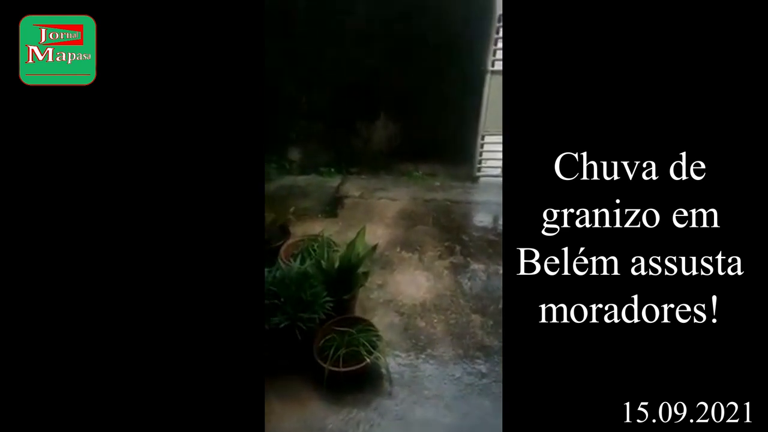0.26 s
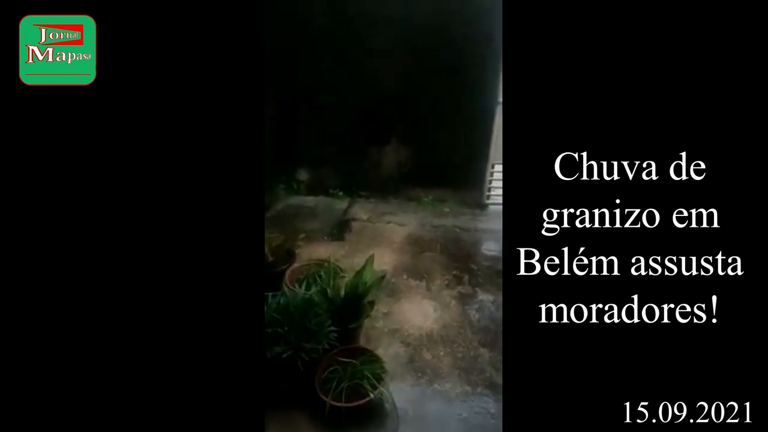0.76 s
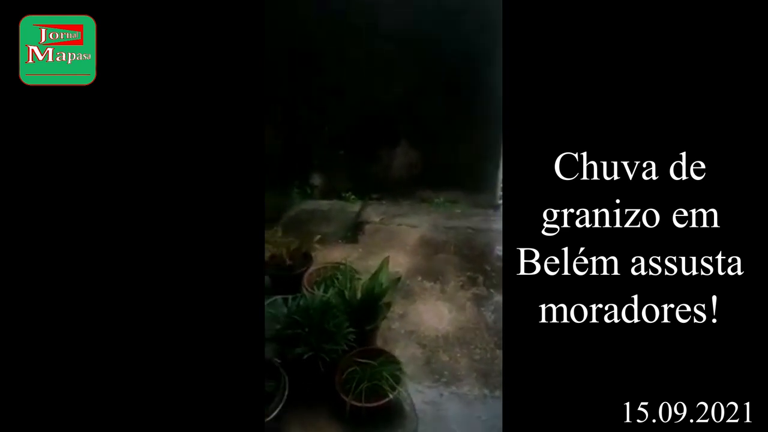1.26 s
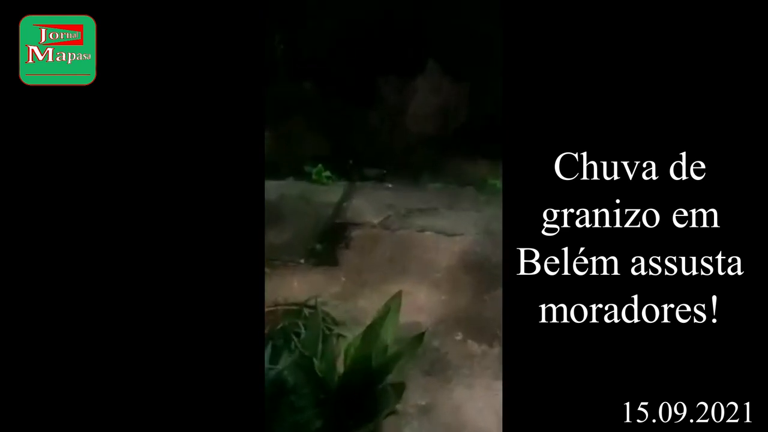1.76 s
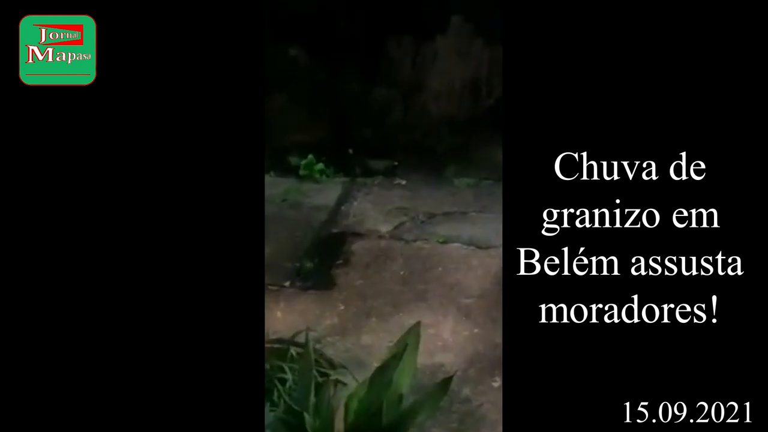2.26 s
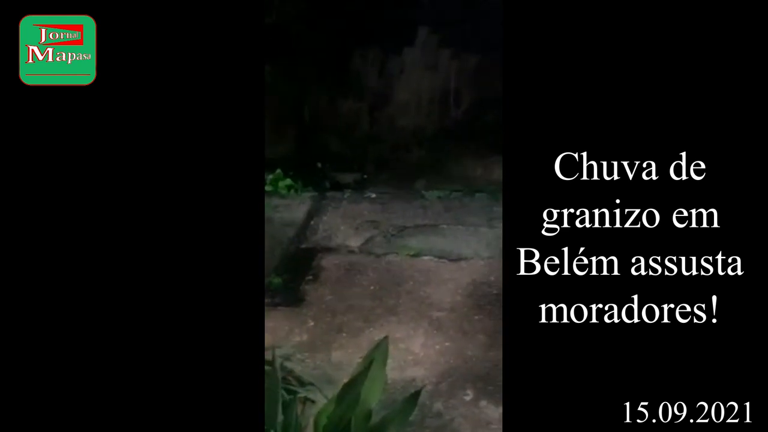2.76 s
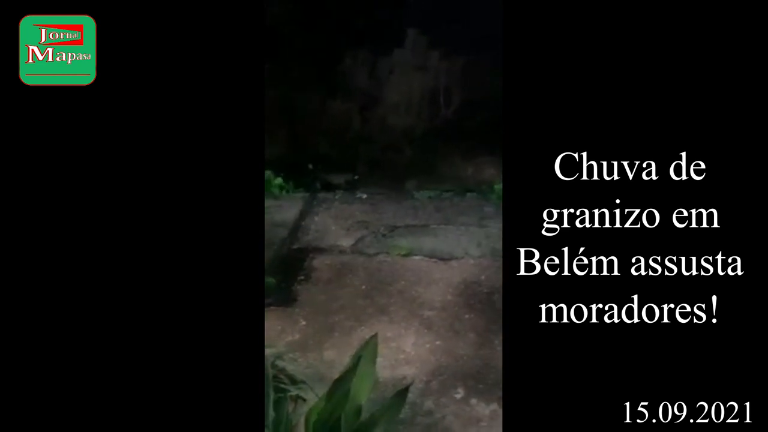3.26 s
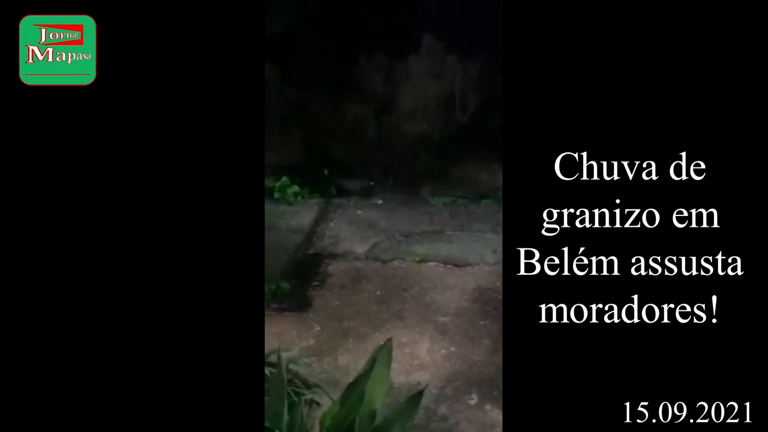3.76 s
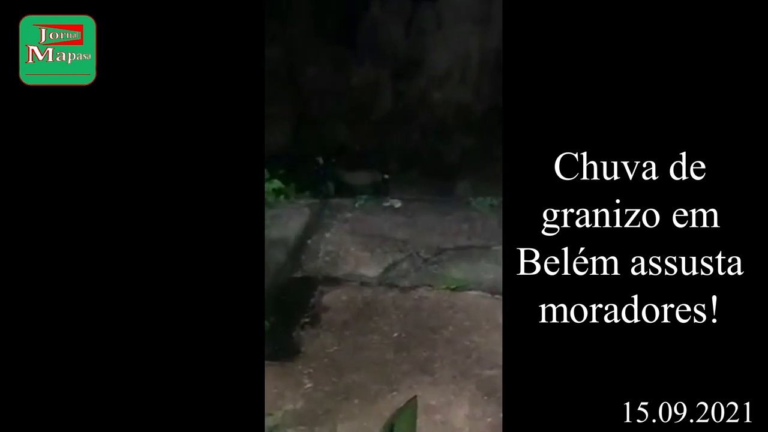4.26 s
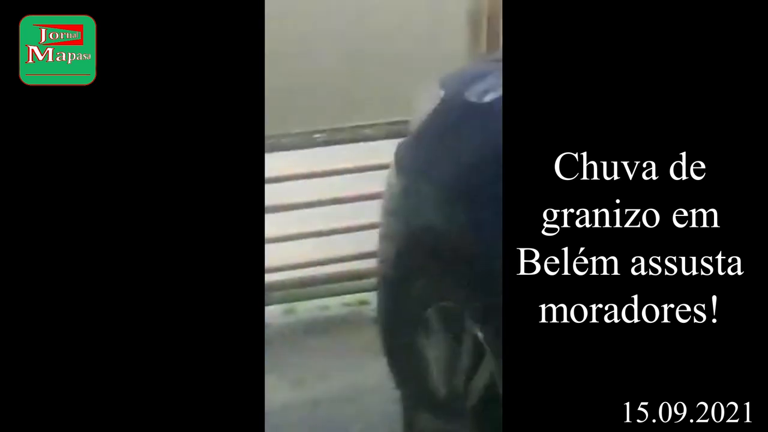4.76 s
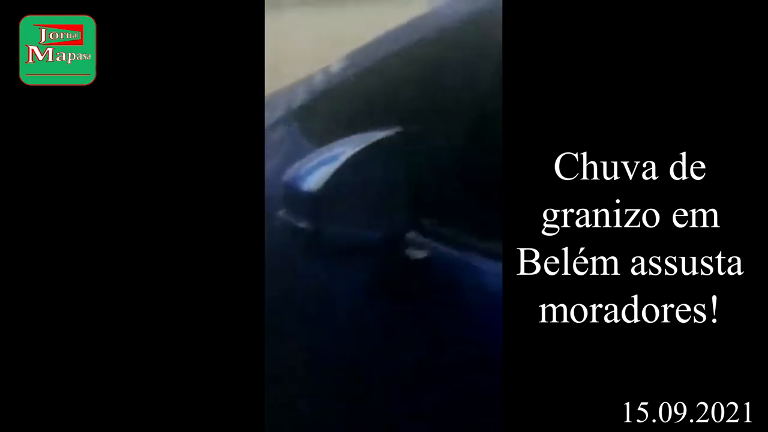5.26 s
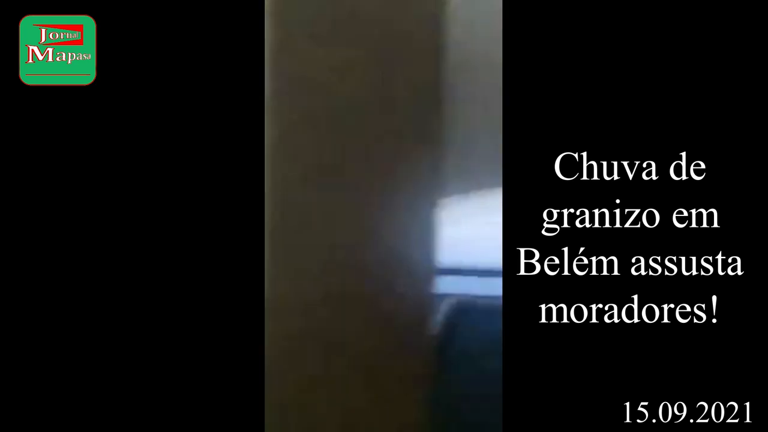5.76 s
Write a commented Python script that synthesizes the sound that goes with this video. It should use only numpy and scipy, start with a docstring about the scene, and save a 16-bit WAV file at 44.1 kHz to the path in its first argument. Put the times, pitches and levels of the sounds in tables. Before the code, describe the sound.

A dense downpour with hail, heard from under a carport roof facing a paved yard. Steady drumming, splashing and hiss fill everything, with constant tiny ticks and irregular sharp cracks of larger stones. Around three and a half seconds a cluster knocks a hollow, ringing sheet. Near five seconds a lumpy low roll swells like distant thunder. The wide stereo pickup is compressed, with flickering, watery treble and dulled top.

```python
"""Hail and downpour at a carport

A downpour with hail falls on a paved yard, heard from under the roof of a carport. Shaped noise drums, splashes
and hisses; bursts of noise make hailstones crack on the paving, clack, or knock on a hollow sheet that rings.
Near the end a low roll of noise, like far thunder, swells through the carport's resonances.
The treble flickers: weak patches drop out, which sounds watery. A thin whine wavers on top."""
import sys
import numpy as np
from scipy import signal
from scipy.fft import rfft, irfft, next_fast_len
from scipy.io import wavfile
from scipy.ndimage import uniform_filter1d, minimum_filter1d

SR = 44100
rng = np.random.default_rng(int(sys.argv[2]) if len(sys.argv) > 2 else 0)


def unload_wav(signal):
    """Save mono or channel-first audio to the path in sys.argv[1] as 16-bit WAV at rate SR, clipped to [-1, 1]."""
    wavfile.write(
        sys.argv[1],
        SR,
        np.round(np.clip(np.atleast_2d(signal).T, -1, 1) * 32767).astype(np.int16),
    )


N = 265641

TIME = np.arange(N) / SR
PADDED = next_fast_len(N, real=True)
FREQ = np.maximum(np.fft.rfftfreq(PADDED, 1 / SR), 1)
STFT_SIZE, STFT_OVERLAP = 2048, 1536  # samples


def from_db(db):
    """Decibels to gain."""
    return 10 ** (np.asarray(db) / 20)


def rms_one(x):
    """Scale to unit power."""
    return x / np.sqrt(np.mean(x ** 2) + 1e-20)


def in_time(rows):
    """Automation curves: one per column after the time, joined by straight lines."""
    seconds, *columns = np.transpose(rows)
    return [np.interp(TIME, seconds, column) for column in columns]


def colour(x, spectrum, modes=()):
    """Give a sound a broad spectrum with resonances standing on it."""
    hz, db = np.transpose(spectrum)
    broad = from_db(np.interp(np.log(FREQ), np.log(hz), db))
    peaks = sum(from_db(level) / (1 + 2j * (FREQ - centre) / width) for centre, width, level in modes)
    return irfft(rfft(x, PADDED) * broad * (1 + peaks), PADDED)[..., :N]


def drift(rate):
    """Slow chance of unit spread, changing about rate times a second."""
    smooth = rfft(rng.standard_normal(PADDED)) / (1 + (FREQ / rate) ** 2)
    return rms_one(irfft(smooth, PADDED)[:N])


def diffuse(alike_hz):
    """Stereo noise from all around: long waves reach left and right much alike, short ones do not."""
    alike = 0.85 / (1 + (FREQ / alike_hz) ** 4)
    alike = alike * FREQ / (FREQ + 8)  # the very lowest waves differ again
    mid, side = rfft(rng.standard_normal((2, PADDED)))
    stereo = np.sqrt(1 + alike) * mid + np.sqrt(1 - alike) * side * [[1], [-1]]
    return rms_one(irfft(stereo, PADDED)[:, :N])


def impacts(per_s, spread_db):
    """Clicks at random moments, many small and few large."""
    sizes = from_db(spread_db * np.minimum(rng.exponential(1, N), 4))
    return sizes * (rng.random(N) < per_s / SR)


def drops(per_s, spread_db, near_db):
    """Single near drops over the smooth merged sound of the far ones."""
    clicks = np.array([impacts(per_s, spread_db) for _ in range(2)])
    near = clicks * rng.choice([-1, 1], (2, N))
    far = rng.standard_normal((2, N))
    return rms_one(from_db(near_db) * rms_one(near) + far)


def patter(x, patchy_db, size=5):
    """The noise flickers at random in small patches of time and pitch, size bins wide."""
    cells = signal.stft(x, nperseg=STFT_SIZE, noverlap=STFT_OVERLAP)[2]
    patches = rng.standard_normal(cells.shape[-2:])
    patches = uniform_filter1d(patches, size=size, axis=0)
    patches = uniform_filter1d(patches, size=5, axis=1)
    patchy = signal.istft(cells * from_db(patchy_db * rms_one(patches)), noverlap=STFT_OVERLAP)[1]
    return rms_one(patchy[..., :N])


def dying(start, t60, rise):
    """Envelope of a blow and its crowd of reflections from walls and roof."""
    age = np.maximum(TIME - start, 0)
    return (1 - np.exp(-age / rise)) * from_db(-60 * np.minimum(age / t60, 3))


# Strength of the downpour, which drives drumming, hiss and small hail.
# Each row: time in seconds, level in dB.
RAIN_STRENGTH = [(0.0, -24), (0.74, -21), (0.94, -19), (1.19, -21), (1.34, -22), (1.63, -23), (2.16, -19),
                 (2.65, -21), (2.9, -18.5), (3.17, -20.5), (3.54, -19), (3.69, -21), (4.43, -24.5),
                 (5.0, -21), (5.16, -22.5), (5.9, -24), (6.02, -21)]
USUAL_RAIN_DB = -22


def strength():
    """How much harder than usual the rain falls, in dB."""
    return in_time(RAIN_STRENGTH)[0] - USUAL_RAIN_DB


# Ebb and flow of the splashing; only its swing about the mean is used.
# Each row: time in seconds, level in dB.
SPLASHING_LEVEL = [(0.0, -30), (0.39, -28.5), (0.7, -29), (0.99, -26), (1.36, -29.5), (1.63, -27.5),
                   (2.18, -25), (2.58, -26.5), (2.93, -25.5), (3.55, -29), (3.64, -29), (4.32, -31),
                   (4.63, -29.5), (4.95, -27), (5.33, -28.5), (6.02, -29)]
# Broad spectra of the drumming, the splashes and the spray. Each row: frequency in Hz, gain in dB.
DRUMMING_SPECTRUM = [(200, 3), (420, 9.5), (600, 18), (1300, 17), (2200, 14.5), (4000, -7.5), (9000, -11)]
SPLASH_SPECTRUM = [(600, -9.5), (1200, -5), (1900, 10), (2700, 11), (3500, 9), (4500, 7.5), (7000, 2.5),
                   (15000, -19)]
HISS_SPECTRUM = [(1500, -8.5), (3000, -1), (4500, 4.5), (6500, 9.5), (10000, 7), (15000, 9)]
# Resonances of the drummed roofs.
# Each row: frequency in Hz, width in Hz, level in dB against the broad spectrum.
ROOF_MODES = [(630, 61, -23), (1052, 17, -8)]
# each layer's level before colouring, and its dB of swing per dB of its level curve
DRUM_DB, DRUM_FOLLOWS = -30, 0.64
HISS_DB, HISS_FOLLOWS = -23, 0.92
SPLASH_DB, SPLASH_FOLLOWS_LEFT, SPLASH_FOLLOWS_RIGHT = -25, 0.9, 1.56
# the rain turns thinner: the drumming drops back
THINNING_START_S, THINNING_TAKES_S, THINNING_DB = 2.8, 0.49, -1.18


def rain():
    """Drumming on roofs, splashes in the wet yard and the hiss of fine spray, each a coloured noise."""
    harder_db = strength()
    thinned = np.clip((TIME - THINNING_START_S) / THINNING_TAKES_S, 0, 1)
    drum_db = DRUM_DB + DRUM_FOLLOWS * harder_db + THINNING_DB * thinned
    hiss_db = HISS_DB + HISS_FOLLOWS * harder_db
    splashing_db, = in_time(SPLASHING_LEVEL)
    follows = np.array([[SPLASH_FOLLOWS_LEFT], [SPLASH_FOLLOWS_RIGHT]])
    splash_db = SPLASH_DB + follows * (splashing_db - splashing_db.mean())

    flurry = drift(25)  # drops arrive in clumps
    thuds = patter(diffuse(alike_hz=580), patchy_db=2.0)
    splashes = patter(drops(per_s=1200, spread_db=5.0, near_db=-8.0), patchy_db=5.0, size=2)
    spray = patter(drops(per_s=2000, spread_db=3.5, near_db=-7.5), patchy_db=4.0, size=2)

    drumming = from_db(drum_db + 0.057 * flurry) * colour(thuds, DRUMMING_SPECTRUM, ROOF_MODES)
    splashing = from_db(splash_db + 0.34 * flurry) * colour(splashes, SPLASH_SPECTRUM)
    hiss = from_db(hiss_db + 0.11 * flurry) * colour(spray, HISS_SPECTRUM)
    return drumming + splashing + hiss


# Broad spectrum of ice on paving, shared by small and big stones. Each row: frequency in Hz, gain in dB.
CRACK_SPECTRUM = [(500, -20), (1500, -7), (3500, -7.5), (5500, -7.5), (7000, -5.5), (8000, 0.5),
                  (10000, -3), (15000, -8)]


def small_hail(per_s, t60, level_db):
    """Small stones tick all the time, each blurred by reflections, more loudly when the rain is harder."""
    stones = impacts(per_s, spread_db=3.0)
    decay = from_db(-120 / (t60 * SR))  # power kept from one sample to the next
    power = signal.lfilter([1], [1, -decay], stones ** 2 + 1e-18)
    ticks = rms_one(np.sqrt(power) * rng.standard_normal((2, N)))
    return from_db(level_db + strength()) * colour(ticks, CRACK_SPECTRUM)


# Resonances of the carport, shared by the steady rumble and the swells.
# Each row: frequency in Hz, width in Hz, level in dB against the broad spectrum.
CARPORT_MODES = [(36.3, 3.6, -10), (53.7, 8.8, -7.5), (78.8, 8.7, 6.5), (116.4, 3.8, -1), (223, 18, -43),
                 (282.7, 19.4, -1), (342, 3.5, 0.5)]
# Broad spectrum of the steady rumble. Each row: frequency in Hz, gain in dB.
RUMBLE_SPECTRUM = [(10, -4.5), (25, -5.5), (40, -11.5), (65, -22.5), (130, -14), (200, -12.5), (300, -17),
                   (450, -16.5), (800, -27.5), (3000, -86)]


def steady_rumble():
    """The storm's steady rumble: unsteady diffuse noise booming in the carport's modes."""
    level_db = -0.5 + 0.91 * drift(13.0)
    return colour(diffuse(alike_hz=560) * from_db(level_db), RUMBLE_SPECTRUM, CARPORT_MODES)


SWELL_ATTACK_S, SWELL_RELEASE_DB_PER_S = 0.033, 48


def swell(start, db, hold):
    """Power of one swell of rumble: it rises, holds and dies away."""
    age = TIME - start
    released = np.maximum(age - SWELL_ATTACK_S - hold, 0)
    rise = np.clip(age / SWELL_ATTACK_S, 0, 1)
    return rise * from_db(db - SWELL_RELEASE_DB_PER_S * released) ** 2


# Swells of low rumble, faint ones first and then the roll.
# Each row: start in seconds, deep part level in dB, upper part level in dB, hold in seconds.
SWELLS = [(0.29, -42, -49, 0.32), (1.447, -34.5, -52, 0.15), (2.113, -37, -48, 0.2),
          (2.796, -35, -47, 0.085), (4.885, -26.5, -39, .13), (5.036, -26, -22, 0.072),
          (5.189, -23.5, -21.5, .02), (5.33, -32, -22.5, .03), (5.395, -25, -22.5, 0.038),
          (5.487, -24, -20, 0.035), (5.596, -23.5, -18, 0.029), (5.768, -27.5, -32, .015),
          (5.916, -32, -27.5, .05)]
# Broad spectra of the two parts. Each row: frequency in Hz, gain in dB.
DEEP_SPECTRUM = [(10, -4), (30, 32), (60, 15.5), (110, 22.5), (170, 21.5), (240, 7.5), (600, 4),
                 (3000, -50)]
UPPER_SPECTRUM = [(80, 8), (160, 17.5), (220, 20.5), (350, 18), (450, 16), (650, 9.5), (1000, 6.5),
                  (3000, -12)]


def rolling_swells():
    """A deep and an upper band of diffuse noise swell separately and boom in the carport's modes."""
    deep_power = sum(swell(start, db, hold) for start, db, _, hold in SWELLS)
    upper_power = sum(swell(start, db, hold) for start, _, db, hold in SWELLS)
    deep = np.sqrt(deep_power) * colour(diffuse(alike_hz=700), DEEP_SPECTRUM, CARPORT_MODES)
    upper = np.sqrt(upper_power) * colour(diffuse(alike_hz=650), UPPER_SPECTRUM, CARPORT_MODES)
    return deep + upper


SNAP_DB, SNAP_T60_S = 2.5, 0.014
# a stone's own pitch stands out of its broad crack
CRACK_Q, CRACK_PITCHED_DB, CRACK_BROAD_DB = 2.8, -3.5, -5.5


def crack(ice, start, db, pan_db, t60, hz):
    """One stone on the paving: a dry snap, then splinters and reflections, around the stone's own pitch."""
    rises = np.array([[0.0007], [0.004]])  # seconds; blows start sharply on the left, more softly on the right
    snap = from_db(SNAP_DB) * dying(start, SNAP_T60_S, rises / 3)
    gains = from_db(db + pan_db * np.array([[0.5], [-0.5]]))
    blow = gains * (snap + dying(start, t60, rises)) * ice
    pitched = signal.lfilter(*signal.iirpeak(hz, CRACK_Q, fs=SR), blow + 1e-18)
    return from_db(CRACK_BROAD_DB) * blow + from_db(CRACK_PITCHED_DB) * pitched


# Big hailstones on the paving.
# Each row: start in seconds, level in dB, left over right in dB, decay time T60 in seconds, pitch in Hz.
CRACKS = [(0.478, -6, 8, 0.033, 7000), (0.825, -3.5, -3, 0.17, 5800), (0.981, -14, -3, 0.06, 6000),
          (1.251, -7.5, 3, 0.27, 6500), (1.300, -5, 0, 0.3, 6200), (1.319, -6.5, -5, 0.2, 7000),
          (1.705, -12, 5, 0.06, 6800), (1.782, -5.5, 1, 0.12, 5500), (1.985, -8, 0, 0.08, 7000),
          (2.081, -3, 3, 0.12, 5400), (2.274, -7, 3, 0.06, 6000), (2.306, -1.5, -5, 0.22, 5070),
          (2.433, -12, -9, 0.05, 5500), (2.484, 1.5, -2, 0.21, 4600), (2.729, -6, 4, 0.18, 3600),
          (2.785, -11, 2, 0.08, 6500), (2.810, -11, -3, 0.24, 5300), (3.075, -6.5, -9, 0.14, 7200),
          (3.525, -2.5, -1, 0.23, 4600), (3.574, -3, -2, 0.15, 6200), (3.619, -4, 0, 0.34, 6640),
          (3.642, -6, -9, 0.18, 5400), (3.945, -7.5, -5, 0.34, 6360), (4.604, -8, 3, 0.05, 6600),
          (4.75, 0, -2, 0.22, 6150), (5.196, -9, 1, 0.08, 7200), (5.357, 1.5, 7, 0.042, 6000),
          (5.514, -10, 10, 0.062, 6500), (5.595, -11.5, 9, 0.11, 6500), (5.870, -10, 6, 0.049, 6500)]


def paving_cracks():
    """Big stones crack on the paving: bursts of one gritty noise, each tuned to its own pitch."""
    shards = from_db(1.0 * drift(120))  # bounces and splinters roughen each crack
    ice = shards * patter(drops(per_s=3500, spread_db=4.0, near_db=-5), patchy_db=2.0)
    return colour(sum(crack(ice, *row) for row in CRACKS), CRACK_SPECTRUM)


# Hailstones with a dull clack. Each row: start in seconds, level in dB.
CLACKS = [(1.795, -12.5), (2.310, -13), (2.485, -18), (3.530, -10), (3.585, -12.5), (4.750, -12.5),
          (5.055, -11), (5.357, -7.5)]
# Broad spectrum of a clack. Each row: frequency in Hz, gain in dB.
CLACK_SPECTRUM = [(600, -32), (1400, -2), (2000, 6.5), (3000, -1.5), (5000, -1.5), (12000, -13)]


def dull_clacks():
    """Some stones clack dully: bursts of patchy mid-range noise, different on left and right."""
    blows = sum(from_db(db) * dying(start, t60=0.3, rise=0.0051) for start, db in CLACKS)
    return colour(blows * patter(rng.standard_normal((2, N)), patchy_db=5.5), CLACK_SPECTRUM)


# Hailstones on a hollow sheet, each spot with its own note.
# Each row: start in seconds, level in dB, rattle decay time T60 in seconds, note in Hz.
KNOCKS = [(2.485, -13, 0.12, 1240), (3.524, -10, 0.15, 1237), (3.612, -1.5, 0.14, 884),
          (3.620, -4, 0.077, 1183), (3.630, -12, 0.1, 626), (3.632, -2, 0.17, 983),
          (3.663, -8.5, 0.37, 1236), (3.947, -7.5, 0.87, 743), (4.469, -12, 0.21, 610)]
# Broad spectrum of the rattle. Each row: frequency in Hz, gain in dB.
KNOCK_SPECTRUM = [(150, -18), (400, -6), (560, -1), (800, 0), (1050, -0.5), (1450, -3.5), (2300, -12.5),
                  (6000, -45)]
# Resonances of the sheet.
# Each row: frequency in Hz, width in Hz, level in dB against the broad spectrum.
SHEET_MODES = [(570, 58, -5), (1010, 25, 1), (1196, 24, 3), (1880, 17, 9.5)]
RING_DB, RING_T60_S, RATTLE_DB = -9, 0.12, -2  # the sheet's note, and its rattle under a knock


def hollow_knocks():
    """A stone sets a hollow sheet going: noise rattles in its modes and the struck spot rings as a sine."""
    blows = sum(from_db(db + RATTLE_DB) * dying(start, t60, rise=0.0014) for start, db, t60, _ in KNOCKS)
    rattle = colour(blows * diffuse(alike_hz=600), KNOCK_SPECTRUM, SHEET_MODES)
    notes = 0
    for start, db, _, hz in KNOCKS:
        ring = dying(start, RING_T60_S, rise=0.0015) * np.sin(2 * np.pi * hz * (TIME - start))
        notes = notes + from_db(db + RING_DB) * ring
    return rattle + notes


# Broad spectrum of the fizz. Each row: frequency in Hz, gain in dB.
FIZZ_SPECTRUM = [(7000, -34), (10500, -8), (12500, 8), (15000, 6)]
FIZZ_START_S, FIZZ_DB, FIZZ_T60_S = 3.940, -6, 0.35


def fizz():
    """Once the top fizzes: a brief burst of high noise that dies away."""
    burst = from_db(FIZZ_DB) * dying(FIZZ_START_S, FIZZ_T60_S, rise=0.015)
    return colour(burst * rng.standard_normal((2, N)), FIZZ_SPECTRUM)


def scene():
    """Rain, small and big hail and rumble together."""
    falling = rain() + small_hail(per_s=80, t60=0.036, level_db=-37.0)
    low = steady_rumble() + rolling_swells()
    big_hail = paving_cracks() + dull_clacks() + hollow_knocks() + fizz()
    return falling + low + big_hail


DROPOUT_DEPTH_DB, DROPOUT_KNEE_DB = 24, 0.5


def drop_weak_patches(x, thresholds, size):
    """The treble flickers: patches weak against their surroundings drop out, which sounds watery."""
    hz, _, cells = signal.stft(x, SR, nperseg=STFT_SIZE, noverlap=STFT_OVERLAP)
    power = np.abs(cells) ** 2
    patch = uniform_filter1d(uniform_filter1d(power, size=size[0], axis=0), size=size[1], axis=1)
    around = uniform_filter1d(uniform_filter1d(power, size=45, axis=0), size=25, axis=1)
    above_db = 10 * np.log10((np.abs(patch) + 1e-20) / (np.abs(around) + 1e-20))
    threshold_hz, threshold_db = np.transpose(thresholds)
    needed_db = np.interp(np.log(hz + 1), np.log(threshold_hz), threshold_db)[:, None]
    passed = 0.5 - 0.5 * np.tanh((needed_db - above_db) / DROPOUT_KNEE_DB)
    # neighbours drop out too
    dropped = 1 - minimum_filter1d(minimum_filter1d(passed, size=3, axis=0), size=3, axis=1)
    return signal.istft(cells * from_db(-DROPOUT_DEPTH_DB * dropped), noverlap=STFT_OVERLAP)[1][:N]


WHINE_HZ, WHINE_LEFT_DB, WHINE_RIGHT_DB = 9937.5, -60, -45


def whine():
    """A thin high whine: a sine whose level wavers at random."""
    wavering = np.sin(2 * np.pi * WHINE_HZ * TIME) * (1 + 0.57 * drift(20))
    return from_db([[WHINE_LEFT_DB], [WHINE_RIGHT_DB]]) * wavering


def limit(x, ceiling):
    """Turn the gain down for a few milliseconds around any peak over the ceiling."""
    needed = ceiling / np.maximum(np.abs(x).max(axis=0), ceiling)
    return x * uniform_filter1d(minimum_filter1d(needed, size=121), size=101)


# Broad colour of the left and right channels: a treble peak, narrow gaps and a dull top.
# Each row: frequency in Hz, gain in dB.
LEFT_COLOUR = [(1000, -0.5), (3600, 0.5), (5000, 3), (5800, 5), (6500, 7.5), (7000, 2), (7500, -4),
               (8100, -17.5), (9300, -17.5), (9750, -79), (10800, -34.5), (11800, -28), (15000, -27)]
RIGHT_COLOUR = [(300, -6), (2300, -4), (3600, -3.5), (5000, -7), (6500, -9.5), (7400, -7.5), (8100, -16.5),
                (8500, -7), (9350, -9), (9700, -66), (10900, -41), (11600, -31), (12200, -26.5),
                (15000, -27)]
# Patches below this level against their surroundings drop out.
# Each row: frequency in Hz, threshold in dB.
LEFT_THRESHOLD = [(400, -20), (1200, -7.5), (2200, -7.5), (2900, -4.4), (3900, -4.5), (5000, -5.6),
                  (6300, -7.7), (7300, -5), (8000, -4.2), (9000, -9), (13000, -6)]
RIGHT_THRESHOLD = [(400, -20), (1200, -5.2), (2400, -5), (3200, -3.6), (4800, -3.2), (6500, -2.8),
                   (8000, -3.6), (9000, -8), (13000, -4.5)]
LEFT_PATCH, RIGHT_PATCH = (5, 4), (10, 5)  # a patch spans this many (frequency bins, frames)
CUTOFF_HZ = 15250


def record(dry):
    """Channel colours, dropouts of weak patches, a thin wavering whine, a peak limiter and a steep top cut."""
    left = drop_weak_patches(colour(dry[0], LEFT_COLOUR), LEFT_THRESHOLD, LEFT_PATCH)
    right = drop_weak_patches(colour(dry[1], RIGHT_COLOUR), RIGHT_THRESHOLD, RIGHT_PATCH)
    limited = limit(np.array([left, right]) + whine(), ceiling=0.9)
    top_cut = signal.ellip(10, 0.1, 80, CUTOFF_HZ, fs=SR, output="sos")
    return signal.sosfilt(top_cut, limited)


dry = scene()
out = record(dry)
unload_wav(out)
```